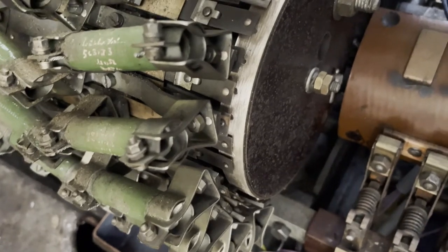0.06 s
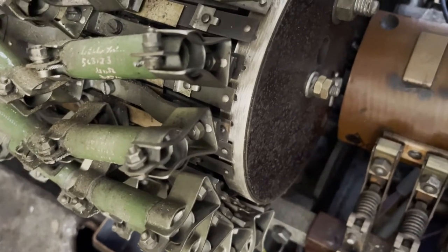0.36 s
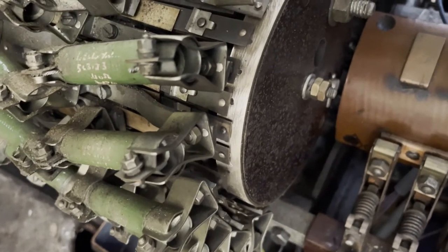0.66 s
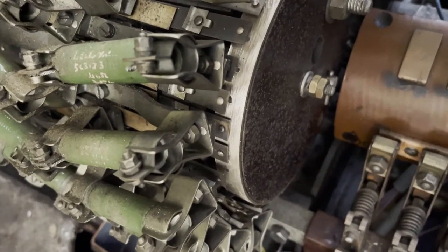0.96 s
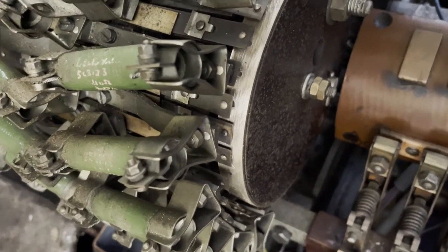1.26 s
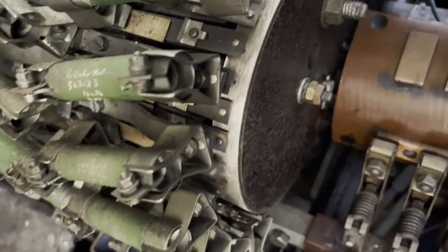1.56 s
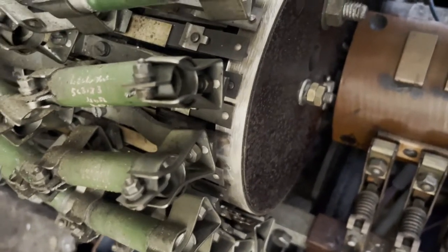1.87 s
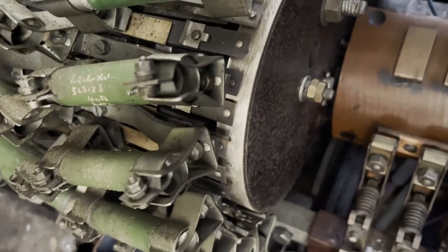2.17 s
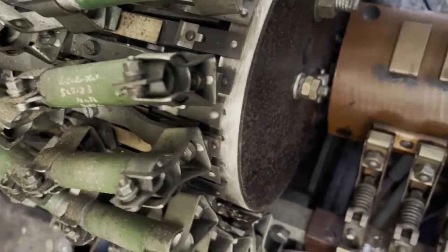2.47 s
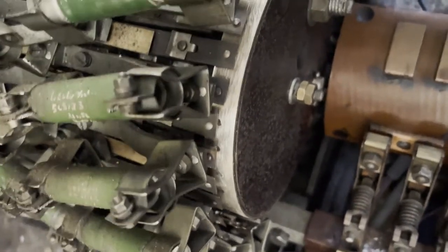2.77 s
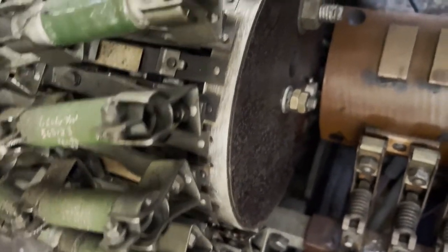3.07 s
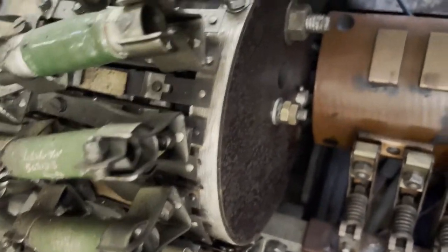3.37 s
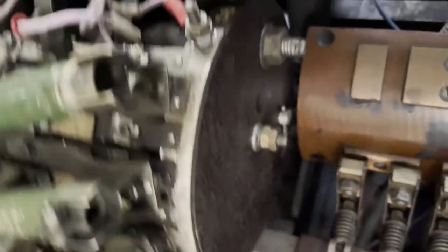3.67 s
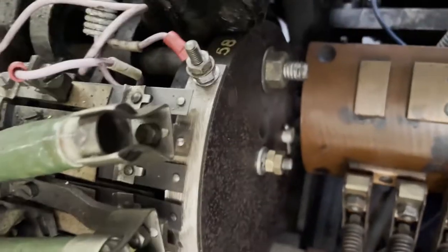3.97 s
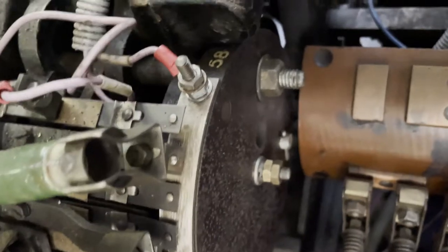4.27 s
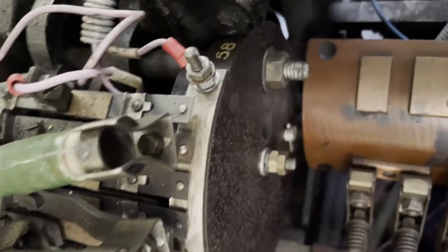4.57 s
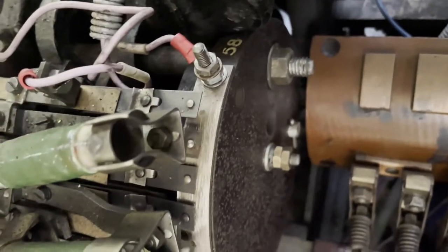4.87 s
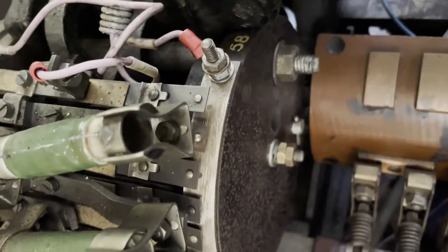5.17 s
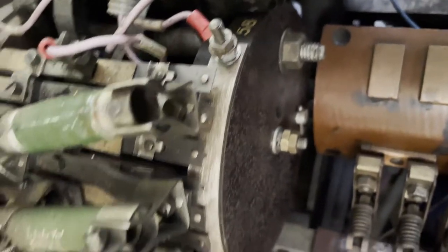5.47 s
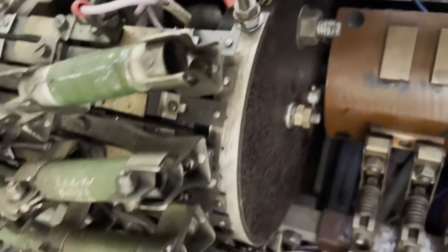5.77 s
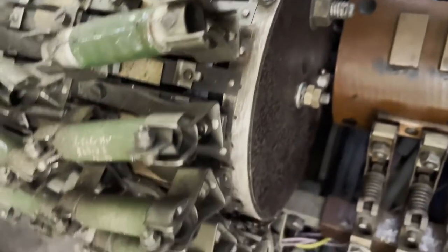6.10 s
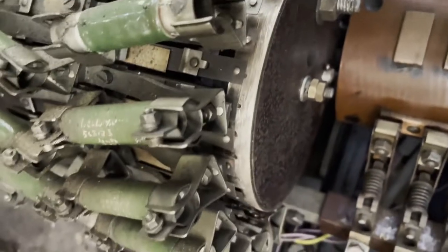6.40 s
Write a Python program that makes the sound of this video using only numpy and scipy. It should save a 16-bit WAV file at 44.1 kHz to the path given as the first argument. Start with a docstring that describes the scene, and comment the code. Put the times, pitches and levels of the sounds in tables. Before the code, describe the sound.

An old tram's rotary switch turns, heard close up inside its open steel housing. Sprung contacts snap sharply and arms clack down over a faint whine and low workshop rumble. A short ratcheting leads into dull knocks, then thin squeals and soft, deep handling noise fill a lull. A quick flurry of snaps, clacks and ratcheting ends the turn, each blow ringing briefly.

```python
"""The rotary switch of an old tram is turned, heard close up inside its open steel housing.
Over a low workshop rumble the drive whines faintly and a contact rubs on the drum. Sprung contacts
snap and seat, the frame knocks at a stop and an arm clacks down. The drum rolls through more snaps,
then ratchets into a run of knocks. Thin squeals and deep swells of handling noise fill a lull, and a
quick flurry of snaps, clacks and ratcheting ends the turn. Each blow rings on in the housing."""
import sys
import numpy as np
from scipy import signal
from scipy.fft import rfft, irfft, next_fast_len
from scipy.io import wavfile
from scipy.ndimage import map_coordinates

SR = 44100
rng = np.random.default_rng(int(sys.argv[2]) if len(sys.argv) > 2 else 0)


def store_wav(level_fs):
    """Save 16-bit WAV to argv[1]."""
    pcm = np.round(np.clip(np.atleast_2d(level_fs), -1, 1) * 32767)
    wavfile.write(sys.argv[1], SR, pcm.T.astype(np.int16))


N = 288414
HIT_SIZE = 16384  # samples in one blow
HIT_T, LONG_T = np.arange(HIT_SIZE) / SR, np.arange(SR) / SR


def amp(db):
    """Decibels to gain."""
    return 10 ** (np.asarray(db) / 20)


def unit(x):
    """Scale to rms 1."""
    return x / np.sqrt(np.mean(x ** 2) + 1e-20)


def unit_energy(x):
    """Scale to an average energy of 1 per channel."""
    return unit(x) / np.sqrt(x.shape[-1])


def curve(points, hz):
    """Read (frequency, value) points along a log frequency axis."""
    freqs, values = np.transpose(points)
    return np.interp(np.log(hz + 1), np.log(freqs + 1), values)


def above(hz, edge_hz):
    """A soft shelf, rising from 0 to 1 around the edge."""
    return hz ** 4 / (hz ** 4 + edge_hz ** 4)


def bell(hz, centre, half_width, height):
    """The bell curve of one resonance."""
    return height / (1 + ((hz - centre) / half_width) ** 2)


def peaks(table, hz):
    """Boost in dB from a set of resonances."""
    return sum(bell(hz, centre, width, db) for centre, width, db in table)


def bands(table, hz):
    """Gain of a bank of resonators, falling away between them."""
    return sum(bell(hz, centre, width, amp(db)) for centre, width, db in table)


def fade(t, t60):
    """Exponential decay, 60 dB down after t60."""
    return np.exp(-np.log(1000) * t / t60)


def swell(s, db, rise, release):
    """A rounded envelope topping out at db at time s, 23.5 dB lower one rise before or release after."""
    t = np.arange(N) / SR - s
    away = np.maximum(-t / rise, t / release)
    return amp(db - 23.5 * np.abs(away) ** 1.86)


def wobble(rate):
    """Smooth random modulation, rate knots a second."""
    knots = rng.standard_normal(int(N * rate / SR) + 4)
    return map_coordinates(knots, [np.arange(N) * rate / SR])


def stereo_noise(size, width):
    """White noise; width is side over mid."""
    mid, side = rng.standard_normal((2, size))
    return unit(np.array([mid + width * side, mid - width * side]))


def filtered(x, response):
    """Apply a frequency response to x."""
    size = x.shape[-1]
    padded = next_fast_len(size + 4096)
    return irfft(rfft(x, padded) * response(np.fft.rfftfreq(padded, 1 / SR)), padded)[..., :size]


def noise_bed(response, width):
    """Filtered stereo noise at rms 1, as long as the scene."""
    return unit(filtered(stereo_noise(N, width), response))


def coloured(x, eq_db):
    """One blow through a minimum-phase EQ, which keeps its attack sharp, at unit energy."""
    cepstrum = irfft(np.log(amp(eq_db(np.fft.rfftfreq(HIT_SIZE, 1 / SR))) + 1e-5))
    cepstrum[1:HIT_SIZE // 2] *= 2
    cepstrum[HIT_SIZE // 2 + 1:] = 0
    return unit_energy(irfft(rfft(x) * np.exp(rfft(cepstrum))))


def dense_ring(decay, width, size=HIT_SIZE):
    """Countless close modes: every band holds the same energy per Hz and dies at its own speed."""
    noise, t = stereo_noise(size, width), np.arange(size) / SR
    centres, t60s = np.transpose(decay)
    split = [filtered(noise, lambda hz: curve(np.c_[centres, solo], hz)) for solo in np.eye(len(decay))]
    return sum(band * fade(t, t60) / np.sqrt(t60) for band, t60 in zip(split, t60s))


def ring(modes, spread):
    """Clear modes, struck at new strengths, a little detuned and spread in phase between the sides."""
    hz, db, t60 = np.transpose(modes)[:, :, None]
    strength, start, skew, detune = rng.standard_normal((4, len(modes), 1))
    envelope = amp(db + 3.2 * strength) * fade(HIT_T, t60)
    phase = 2 * np.pi * (hz * (1 + 0.0092 * detune) * HIT_T + start)
    channels = [(envelope * np.sin(phase + side * spread * skew)).sum(0) for side in (1, -1)]
    return unit_energy(np.array(channels))


def add(track, s, sound, rise):
    """Lay a blow into the track at time s, with an attack time constant of rise seconds."""
    start = round(s * SR)
    attack = 1 - np.exp(-np.arange(sound.shape[-1]) / SR / rise)
    part = (sound * attack)[..., :N - start]
    track[..., start:start + part.shape[-1]] += part


# EQ of the low rumble and of the hiss: (frequency [Hz], gain [dB])
RUMBLE_EQ = [(13, -30), (22, -16.5), (38, -3.5), (59, 0.5), (123, -11.5), (193, -15), (349, -24),
             (500, -23.5), (691, -49), (900, -40.5), (1170, -72), (1980, -120)]
HISS_EQ = [(350, -15), (600, -5), (1030, -11.5), (1390, -11.5), (1700, -14), (1880, -16.5), (1960, -19),
           (4840, -27), (16000, -37)]
# deep swells of handling noise: (time [s], level [dB], rise [s], release [s])
HANDLING_SWELLS = [(2.9, -42, 0.22, 0.9), (3.751, -48, 0.81, 0.9), (4.6, -54, 0.83, 0.44),
                   (5.58, -52, 0.42, 0.22), (6.3, -45, 0.48, .5)]


def room_and_handling():
    """A low room rumble and thin hiss, with deep swells of handling noise."""
    rumble = noise_bed(lambda hz: amp(curve(RUMBLE_EQ, hz)), width=0.17)
    handling = noise_bed(lambda hz: amp(curve(RUMBLE_EQ, hz)) * (1 - above(hz, 120)), width=0.15)
    hiss = noise_bed(lambda hz: amp(curve(HISS_EQ, hz)), width=0.65)
    swells = sum(swell(*row) for row in HANDLING_SWELLS)
    drift = amp(2 * wobble(rate=2))
    return drift * (amp(-49.5) * rumble + swells * handling) + amp(-66.5) * hiss


# squeals of the drive: (time [s], level [dB], rise [s], release [s], pitch [Hz], glide [Hz/s],
# skirt width [Hz], clear tone [dB], octave [dB], third partial [dB])
SQUEALS = [(.01, -54.5, 0.9, 0.23, 1119, -11, 70.3, -8, -0.5, -23.5),
           (0.499, -60.5, 0.4, 0.8, 1118, -20, 100, -15, -4.5, -17.5),
           (1.3, -70.5, .45, 0.4, 1068, -70, 90.2, -16.5, 3, -18),
           (2.96, -53.5, .08, 0.56, 1603, -170, 100, -10.5, -6.5, -40),
           (2.96, -56.5, 0.088, 0.81, 1394, -17.5, 109, -12.5, -15.5, -42),
           (3.25, -59, 0.15, 0.57, 1347, -19, 80, -8, -12.5, -27.5),
           (3.32, -66.5, 0.13, 0.16, 1333, -31, 35.2, -2.5, -10, -12),
           (3.359, -64.5, 0.27, 0.31, 1544, -0.5, 50.64, -3, -10, -31),
           (4.361, -63.5, 0.31, 0.27, 1503, 60, 110, -21, -22, -30),
           (6.29, -61.5, 0.23, 0.38, 1338, -600, 110, -14.5, -19, -34)]


def whine():
    """Dry bearings squeal: each partial is a thin tone, with a rough skirt below as the grip slips."""
    t, track = np.arange(N) / SR, np.zeros(N)
    for s, db, rise, release, pitch_hz, glide, width_hz, clear_db, octave_db, third_db in SQUEALS:
        on = np.abs(t - s) < 1.6
        envelope = swell(s, db, rise, release)[on]
        gliding_hz = pitch_hz + glide * np.clip(t - s, -rise, release)
        jitter = 1 + 0.0064 * wobble(rate=60)
        phase = 2 * np.pi * np.cumsum((gliding_hz * jitter)[on]) / SR
        clear = np.sqrt(2) * amp(clear_db + 1.5 * wobble(rate=35)[on])  # the tone catches and lets go
        skirt = lambda hz: (1 - above(hz, 380)) / np.hypot(1, hz / width_hz)
        for order, partial_db in enumerate((0, octave_db, third_db), 1):
            noise = unit(filtered(rng.standard_normal(N)[on], skirt))
            slip = signal.hilbert(noise, next_fast_len(len(noise)))[:len(noise)]
            partial = np.real((slip + clear) * np.exp(-1j * order * phase))  # lower sideband only
            track[on] += envelope * amp(partial_db) * partial
    return np.array([track, track])


# EQ of the scrape: (frequency [Hz], gain [dB])
SCRAPE_EQ = [(300, 8.5), (700, -5.5), (1400, 2.5), (2200, 2), (3300, -5), (4800, -5), (7500, -17.5),
             (10000, -20.5), (16000, -28)]
# resonances of the scrape and of a singing contact: (frequency [Hz], half width [Hz], gain [dB])
SCRAPE_PEAKS = [(330, 30, 6), (1340, 150, 0), (2070, 130, -6), (2680, 220, -1), (3570, 150, 2.5),
                (4707, 320, -1.5)]
SINGING_PEAKS = [(1120, 43, 2.5), (1320, 60, 0), (2080, 75, -1.5), (2680, 36, -9.5), (3610, 60, -13.5),
                 (4550, 110, -4), (5230, 110, -8.5), (6400, 410, -18)]
# strokes over the drum: (time [s], level [dB], rise [s], release [s], brightness [dB], singing [dB])
WIPES = [(.45, -58, 0.19, 0.91, -23, -25.5), (1.24, -72, 0.18, 0.22, 15.5, 5),
         (1.501, -59.5, 0.25, 0.59, 4, -0.5), (2.0, -50.5, 0.15, 0.13, 11.5, -22),
         (2.35, -46.5, 0.22, 0.21, 3, -28), (2.651, -56.5, 0.22, 0.28, 3, -25),
         (3.25, -66, 0.37, 1, -7, -17), (5.07, -46, 0.24, 0.21, 0, -14.5),
         (5.44, -41.5, 0.12, 0.1, 2.5, -10), (5.899, -77, 0.48, 0.5, 4, -3),
         (6.18, -58.5, 0.23, 0.14, 16.5, -7), (6.54, -43, 0.16, 0.25, 1, -20)]


def rub():
    """Metal wipes over the drum with a fine, uneven scrape; on some strokes the contact sings."""
    scrape = noise_bed(lambda hz: amp(curve(SCRAPE_EQ, hz) + peaks(SCRAPE_PEAKS, hz)), width=1.0)
    edge = filtered(scrape, lambda hz: above(hz, 5023))
    singing = noise_bed(lambda hz: bands(SINGING_PEAKS, hz), width=0.72)
    track = np.zeros((2, N))
    for s, db, rise, release, bright_db, singing_db in WIPES:
        texture = scrape + (amp(bright_db) - 1) * edge + amp(singing_db) * singing
        track += swell(s, db, rise, release) * texture
    return amp(0.69 * wobble(rate=110)) * track


# EQ of a contact's crack: (frequency [Hz], gain [dB])
SNAP_EQ = [(70, -32.5), (170, -10.5), (320, -13), (1120, -12.5), (1600, -6.5), (2000, -11), (2600, -9.5),
           (3080, -2.5), (3500, -6.5), (4910, -1.5), (8360, -1), (9550, 1), (12100, -7.5), (14500, 1.5),
           (16000, -10)]
# its decay: (frequency [Hz], t60 [s])
SNAP_DECAY = [(500, 0.1), (1500, 0.18), (5000, 0.038), (12000, 0.025)]
# modes of the contact finger: (pitch [ratio to its ring], level [dB], t60 [s])
FINGER_MODES = [(.62, -15.5, 0.02), (1, 2.5, 0.018), (1.122, 1, 0.011)]
# modes of the steel frame, shared with the clacks: (frequency [Hz], level [dB], t60 [s])
FRAME_MODES = [(319.8, -3, 0.39), (461.3, -0.5, 0.11), (533, -5, 0.17), (1125, 1, 0.12), (1462, -2.5, 0.2),
               (1604, -3.5, 0.12), (2456, -3, 0.09), (3034, 3.5, 0.055), (3620, -7.5, 0.25),
               (4230, -1.5, 0.11), (4730, 3.5, .06), (5290, -3, 0.083)]


def contact(db, sparkle_db, ring_hz, tip_hz, holder_hz, holder_db, frame_db=-22.5):
    """One contact cracks and rings its finger and the frame; returns direct sound and housing send."""
    spot_db = 3 * rng.standard_normal(64)  # each strike meets a new spot, which colours it anew
    ripple = lambda hz: np.interp(hz / 400, np.arange(len(spot_db)), spot_db)
    metal = lambda hz: bell(hz, tip_hz, 400, 3.5) + bell(hz, holder_hz, 280, holder_db)
    eq = lambda hz: curve(SNAP_EQ, hz) + sparkle_db * above(hz, 7500) + metal(hz) + ripple(hz)
    impact = amp(-2.5) * unit_energy(stereo_noise(HIT_SIZE, width=0.2) * fade(HIT_T, t60=0.011))
    body = unit_energy(dense_ring(SNAP_DECAY, width=0.23))
    crack = coloured(impact + body, eq)
    finger_db = np.interp(db, [-35, -15], [-20, -6])  # harder strikes ring more
    finger = amp(finger_db) * ring(np.array(FINGER_MODES) * [ring_hz, 1, 1], spread=0.5)
    frame = amp(frame_db) * ring(FRAME_MODES, spread=0.39)
    return amp(db + 15.5) * np.array([crack + finger + frame, crack + frame])


# switching contacts: (time [s], level [dB], sparkle [dB], ring [Hz], tip ring [Hz], holder ring [Hz],
# holder boost [dB], flight [s], seating over snap [dB], seat ring [Hz])
SNAPS = [(0.5585, -8.5, -2, 5070, 9250, 3150, 6.5, 0.013, -5.5, 4980),
         (1.5555, -9, 0.5, 4490, 12340, 1900, 0.5, 0.017, -1, 4400),
         (1.864, -17, -7, 4640, 9430, 1580, 3.5, 0.018, 1.5, 3950),
         (1.869, -8, -3, 5300, 10770, 1650, 6.5, 0.03, -12, 6250),
         (2.2164, -14.5, 1.5, 4435, 12220, 3000, 3, .0105, -1, 5230),
         (4.0291, -39.5, 11, 3887, 11700, 2500, 1.5, 0.023, -2.5, 3890),
         (4.559, -48, -4.5, 3580, 2750, 2600, 5.5, 0.023, 13, 3400),
         (4.9029, -14.5, 5, 5270, 9700, 1700, 1, 0.0085, -1.5, 3950),
         (5.363, -11, -0.5, 4900, 9440, 1850, 14, .0156, 3, 3920),
         (5.668, -7.5, 2, 4950, 10450, 1850, 9.5, 0.018, 1, 6700),
         (5.8577, -16.5, -5.5, 4940, 9600, 2100, 5.5, 0.011, -3, 4530),
         (6.401, -19, -8, 4700, 9020, 1900, 8, 0.0047, 7, 4530)]
# touched contacts: (time [s], level [dB], sparkle [dB], ring [Hz], tip ring [Hz], holder ring [Hz],
# holder boost [dB])
CLICKS = [(0.5664, -25, 3, 5000, 12500, 3150, 4), (1.9727, -30.5, -13, 3150, 9300, 1600, 14),
          (2.6015, -39, 9.5, 4490, 14400, 1700, 2), (3.42, -54, 0, 4500, 9360, 2500, 1),
          (4.357, -60, 3, 4430, 11000, 2500, 2), (5.263, -56.5, 3.5, 4400, 13050, 2500, 4.5),
          (5.3608, -17, -8.5, 3930, 9270, 1800, 3), (5.6427, -32, 4, 4600, 12400, 1800, 0),
          (5.827, -17, -8.5, 4800, 8910, 2200, 3), (5.8934, -9, 3.5, 5300, 9460, 1850, 1),
          (6.0986, -8, 2, 5380, 8840, 2200, 13.5), (6.4339, -13.5, 3.5, 5980, 13720, 1800, 6)]


def snaps():
    """A switching contact sounds twice, leaving the cam and seating; one only touched clicks once."""
    track = np.zeros((2, 2, N))  # direct sound and housing send, both stereo
    for s, db, sparkle_db, ring_hz, *tip_and_holder, flight_s, seat_db, seat_hz in SNAPS:
        add(track, s, contact(db, sparkle_db, ring_hz, *tip_and_holder), rise=0.00047)
        # seating is a touch duller and rings the frame more
        seating = contact(db + seat_db, sparkle_db - 0.5, seat_hz, *tip_and_holder, frame_db=-16)
        add(track, s + flight_s, seating, rise=0.0005)
    for s, *click in CLICKS:
        add(track, s, contact(*click), rise=0.00062)
    return track


# EQ of a knock: (frequency [Hz], gain [dB])
KNOCK_EQ = [(41, -31.5), (70, -1.5), (309, 0), (671, -12.5), (1120, -13), (1390, -22.5), (1660, -22),
            (2240, -23.5), (5770, -37), (6290, -40), (12000, -54.5), (15600, -105), (22000, -120)]
# its decay: (frequency [Hz], t60 [s])
KNOCK_DECAY = [(120, 0.42), (400, 0.21), (1200, 0.11), (6000, 0.12)]
# hits on the frame: (time [s], level [dB], thump [dB], edge [dB], ring [Hz], panel boom [dB])
KNOCKS = [(0.648, -19.5, -28.5, 5, 938, -18), (2.589, -29, -43.5, 14, 1670, -50),
          (2.675, -16, -23, 12, 946, -17.5), (2.771, -8.5, -5, -11, 1566, -21),
          (2.838, -17, 17.5, -25.5, 100, -31), (4.458, -30, -11.5, -10, 1520, -46.5)]


def knocks():
    """The frame knocks at the stops: dull, heavy blows with one broad resonance and a slow boom."""
    track = np.zeros((2, N))
    for s, db, thump_db, edge_db, ring_hz, boom_db in KNOCKS:
        shelves = lambda hz: thump_db * (1 - above(hz, 360)) + edge_db * above(hz, 2874)
        eq = lambda hz: curve(KNOCK_EQ, hz) + bell(hz, ring_hz, 150, 13) + shelves(hz)
        blow = coloured(dense_ring(KNOCK_DECAY, width=0.51), eq)
        add(track, s, amp(db + 19.5) * blow, rise=0.00042)
        add(track, s, amp(boom_db + 23.5) * panel_boom(), rise=0.11)
    return track


# low resonances of the panels: (frequency [Hz], half width [Hz], gain [dB])
PANEL_PEAKS = [(104.9, 11, 5.5), (176, 18, -0.5), (244, 16, -11), (322, 8.3, -11)]


def panel_boom():
    """The loose panels rumble in broad resonances, with no clear pitch."""
    rumble = filtered(stereo_noise(SR, width=0.2), lambda hz: bands(PANEL_PEAKS, hz))
    return unit_energy(rumble * fade(LONG_T, t60=0.5))


# EQ of a clack: (frequency [Hz], gain [dB])
CLACK_EQ = [(53, -41.5), (90, -12.5), (296, 4.5), (521, -3), (690, -8.5), (1440, -4), (2130, -8),
            (2650, -9), (3220, -5.5), (3830, -8.5), (5180, -6), (6300, -11), (8000, -19), (10100, -17),
            (16000, -42)]
# its decay: (frequency [Hz], t60 [s])
CLACK_DECAY = [(150, 0.19), (400, 0.2), (1200, 0.099), (4000, 0.14), (12000, 0.033)]
# contact arms landing: (time [s], level [dB], crack [dB], thump [dB], sparkle [dB], after-ring [dB],
# spring buzz [dB], arm ring [Hz], arm boost [dB], frame ring [dB])
CLACKS = [(0.6593, -10, 3.5, -8, 2.5, -4, -7, 3335, 9.5, 2.5),
          (2.2191, -6.5, -5.5, -7, 12, -3, -10, 3420, 7, -2.5),
          (4.881, -5.5, -5.5, -8.5, 5.5, -28.5, -27.5, 4190, 2, 6),
          (4.890, -6.5, -7, -12, 17.5, -35.5, -22, 483, 7.5, -3.5),
          (5.723, -4, -5, -12.5, -6, -5.5, -26, 1730, 6.5, 4.5),
          (5.733, -11, -8, -2.5, 13, 0, -16, 312, 9.5, 2), (6.434, -5, -3.5, -22, 14, -9, -17, 1110, 2, -2),
          (6.438, -8.5, -11, 0, -16, -6.5, -19, 286, 1, 5.5)]


def clacks():
    """Heavy arms hit the drum and shake frame, panels and spring; returns direct and housing send."""
    track, send = np.zeros((2, 2, N))
    for s, db, crack_db, thump_db, sparkle_db, after_db, spring_db, arm_hz, arm_db, frame_db in CLACKS:
        shelves = lambda hz: thump_db * (1 - above(hz, 420)) + sparkle_db * above(hz, 9300)
        eq = lambda hz: curve(CLACK_EQ, hz) + bell(hz, arm_hz, 0.11 * arm_hz, arm_db) + shelves(hz)
        blow = amp(db + 14.5) * coloured(dense_ring(CLACK_DECAY, width=0.57), eq)
        burst = stereo_noise(HIT_SIZE, width=0.35) * fade(HIT_T, t60=0.017)
        crack = amp(db + crack_db + 14.5) * coloured(burst, lambda hz: eq(hz) + 6 * above(hz, 1500))
        frame = amp(db + frame_db) * ring(FRAME_MODES, spread=0.21)
        add(track, s, blow + crack + frame, rise=0.00074)
        add(track, s, amp(db + after_db + 10.5) * panel_boom(), rise=0.11)
        add(track, s, amp(db + spring_db + 15) * spring_buzz(), rise=0.0018)
        add(send, s, amp(after_db) * blow, rise=0.00078)
    return track, send


# EQ of an arm's coil spring: (frequency [Hz], gain [dB])
SPRING_EQ = [(2000, -18.5), (2700, -13), (3200, -6.5), (3600, -1), (3880, -4), (4350, -3.5), (4950, -12.5),
             (5600, -12.5), (7500, -36.5)]
# its clustered modes: (frequency [Hz], half width [Hz], gain [dB])
COIL_PEAKS = [(2500, 40, 11), (3400, 50, 6.5), (3610, 35, 6), (4273, 40, 5), (4394, 30, 7), (5330, 50, 4.5)]


def spring_buzz():
    """A jolted coil spring buzzes: a hard first shake, then a slow fade."""
    response = lambda hz: amp(curve(SPRING_EQ, hz) + peaks(COIL_PEAKS, hz))
    coils = filtered(stereo_noise(SR, width=0.27), response)
    return unit_energy(coils * (1.4 * fade(LONG_T, t60=0.2) + fade(LONG_T, t60=0.68)))


# EQ of the rolling drum: (frequency [Hz], gain [dB])
ROLL_EQ = [(80, -19), (190, 2), (450, -3), (800, -9), (1400, -24), (2200, -28.5), (5000, -52.5)]
# its turns between steps: (time [s], level [dB], rise [s], release [s])
ROLLS = [(1.27, -57, 0.24, 0.4), (1.98, -56.5, 0.16, 0.18), (5.52, -59, 0.55, 0.4)]


def roll():
    """The turning drum grumbles unevenly in its bearings."""
    grumble = noise_bed(lambda hz: amp(curve(ROLL_EQ, hz)), width=0.38)
    swells = sum(swell(*row) for row in ROLLS)
    return swells * amp(3.2 * wobble(rate=40)) * grumble


# EQ of one tooth's tick: (frequency [Hz], gain [dB])
TOOTH_EQ = [(120, -50), (200, -30), (400, 4.5), (620, -5), (800, -6), (1200, -4), (1600, -3), (2700, -3.5),
            (4040, -1), (7970, -13), (16000, -19.5)]
# modes of the ratchet wheel: (frequency [Hz], level [dB], t60 [s])
WHEEL_MODES = [(322.5, -2.5, 0.25), (450, 3, 0.065), (754, -5.5, 0.36), (922, -9.5, 0.19),
               (1491, 0.5, 0.22), (1770, 5.5, 0.083), (1810, -1.5, 0.1), (2210, -8.5, 0.11), (3180, 1, .06),
               (3680, 8, 0.023), (4220, 10.5, .02), (5170, 6, .018)]
# pushes on the ratchet: (time [s], length [s], rate [teeth/s], loudest after [s], level [dB],
# sparkle [dB], wheel ring [dB], panel hum [dB])
RATCHET_RUNS = [(2.3604, .2, 46.6, 0.028, -30, 8, -17, -6.5), (5.412, .2, 52, 0.091, -20, 7.5, -2, -4),
                (6.117, .07, 47, 0.0053, -23, 17.5, -18, -11)]


def ratchet():
    """Teeth tick past, weaker away from the hardest push, and keep the wheel and panels humming."""
    track = np.zeros((2, N))
    falloff_db_per_s, scatter_db = 75, 1.5
    decay = [(400, 0.036), (1500, 0.094), (4500, 0.064), (12000, 0.013)]  # (frequency [Hz], t60 [s])
    for start, length, rate, loudest, run_db, sparkle_db, wheel_db, hum_db in RATCHET_RUNS:
        eq = lambda hz: curve(TOOTH_EQ, hz) + sparkle_db * above(hz, 5600)
        for t in np.arange(0, length, 1 / rate):
            db = run_db - falloff_db_per_s * abs(t - loudest) + scatter_db * rng.standard_normal()
            tick = coloured(dense_ring(decay, width=0.54), eq)
            wheel = amp(wheel_db) * ring(WHEEL_MODES, spread=0.28)
            add(track, start + t, amp(db + 13.5) * (tick + wheel), rise=0.00013)
            add(track, start + t, amp(db + hum_db + 13.5) * panel_boom(), rise=0.014)
    return track


# decay of the housing's reverb: (frequency [Hz], t60 [s])
HOUSING_DECAY = [(120, 0.94), (400, 0.55), (1500, 0.61), (4000, 0.62), (9000, 0.36), (15000, 0.36)]
# its EQ: (frequency [Hz], gain [dB])
HOUSING_EQ = [(100, -9), (400, 3), (800, 2), (1500, -3), (4000, -4.5), (8000, -2.5), (15000, -4.5)]
# sheet steel singing on: (frequency [Hz], half width [Hz], gain [dB])
HOUSING_PEAKS = [(1426, 28, 9.5), (2300, 50, 6.5), (3020, 68, 5), (3580, 60, 4.5), (4400, 80, 2),
                 (5330, 110, 4.5), (6550, 140, 2)]


def housing(send):
    """The steel housing and the room behind it ring on after each blow."""
    tail = unit_energy(dense_ring(HOUSING_DECAY, width=0.83, size=SR))
    wet = signal.fftconvolve(send.mean(0)[None], tail, axes=1)[:, :N]
    return filtered(wet, lambda hz: amp(curve(HOUSING_EQ, hz) + peaks(HOUSING_PEAKS, hz)))


# stereo phase of the close contacts, and of the mix's treble: (frequency [Hz], left minus right [rad])
CONTACT_PHASE = [(900, -1.4), (1350, -1.8), (2000, -1.5), (2600, -0.12)]
TREBLE_PHASE = [(5800, 0), (7000, -1.3), (8000, -3.1), (10000, -5), (11400, -6.3), (13000, -7.4),
                (15000, -9.4), (16500, -10)]
# stereo balance of the mix: (frequency [Hz], left minus right [dB])
BALANCE = [(60, -2.8), (250, -4.5), (500, -3.7), (1000, -1), (2000, 1.3), (4000, .4), (10000, -1.1)]


def scene():
    """Mix switch, housing, room and handling noise, then offset the sides in level and phase."""
    sides = np.array([[1], [-1]]) / 2
    phase_offset = lambda table, hz: np.exp(1j * sides * curve(table, hz))
    frame, teeth, drive = knocks(), ratchet(), whine()
    contacts, contact_send = snaps()
    arms, arm_send = clacks()
    close_contacts = filtered(contacts, lambda hz: phase_offset(CONTACT_PHASE, hz))
    wet = housing(amp(-11) * contact_send + arm_send + amp(-10.5) * frame + amp(-4.5) * teeth + drive)
    switch = close_contacts + arms + frame + teeth + amp(-4) * drive + rub() + roll()
    mix = switch + wet + room_and_handling()
    return filtered(mix, lambda hz: amp(sides * curve(BALANCE, hz)) * phase_offset(TREBLE_PHASE, hz))


def record(dry):
    """A steep low-pass takes off the very top of the treble."""
    cutoff_hz = 16300
    return filtered(dry, lambda hz: 1 / np.sqrt(1 + (hz / cutoff_hz) ** 120))


dry = scene()
out = record(dry)
store_wav(out)
```